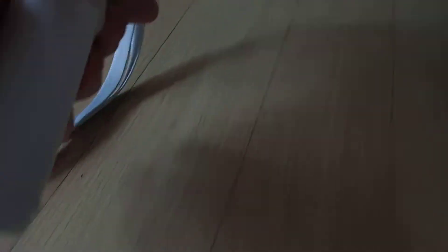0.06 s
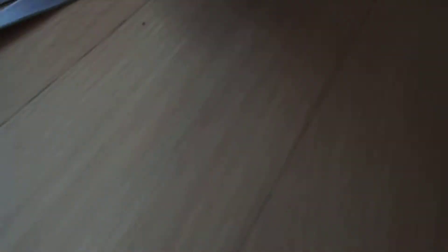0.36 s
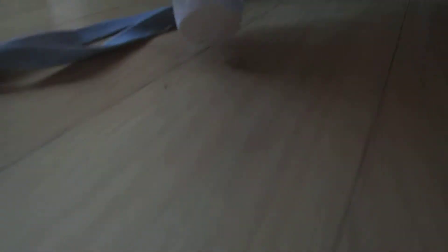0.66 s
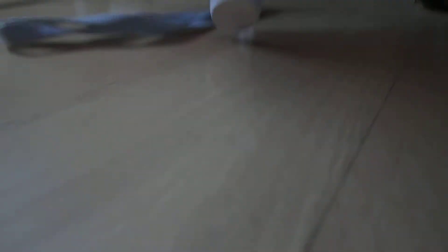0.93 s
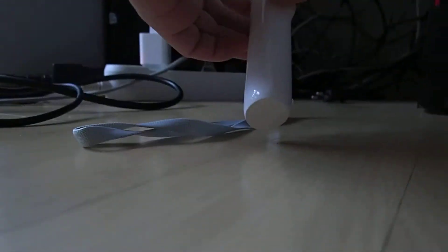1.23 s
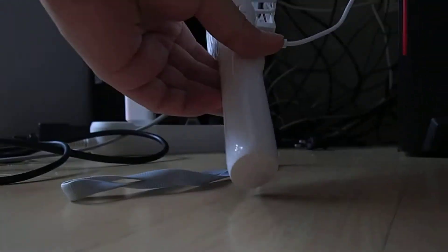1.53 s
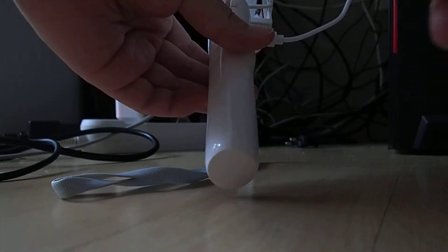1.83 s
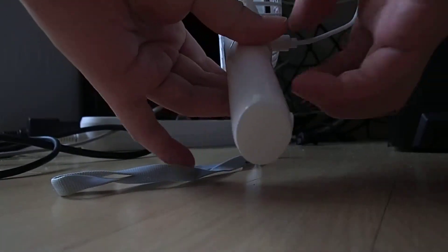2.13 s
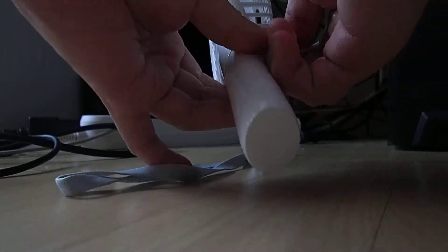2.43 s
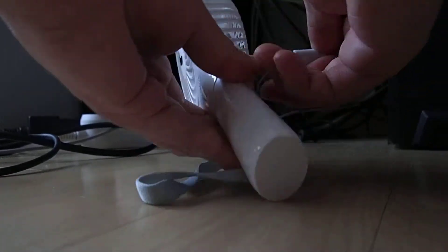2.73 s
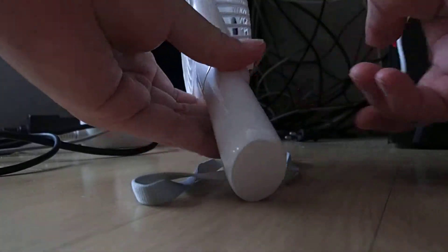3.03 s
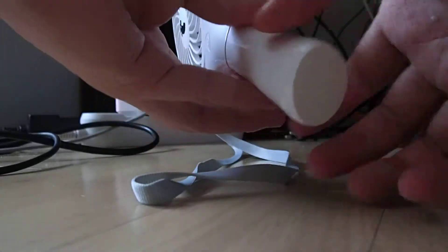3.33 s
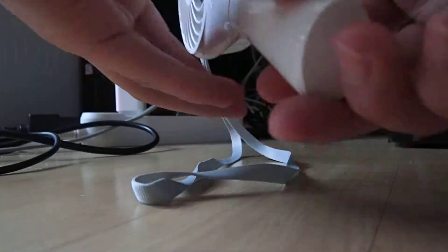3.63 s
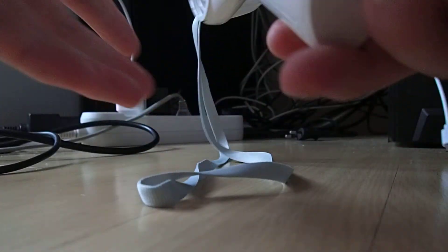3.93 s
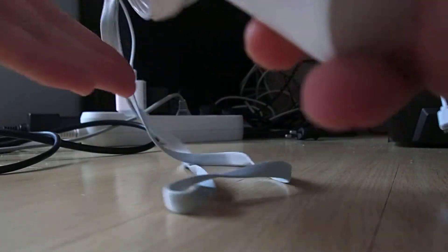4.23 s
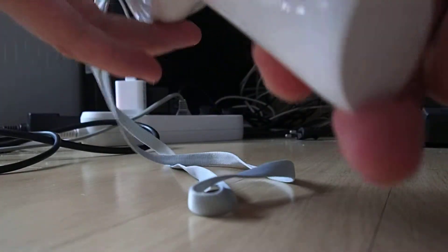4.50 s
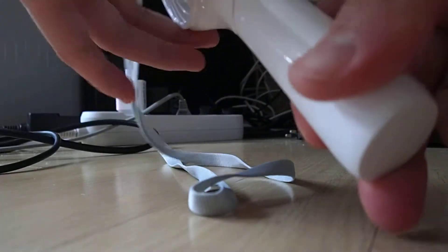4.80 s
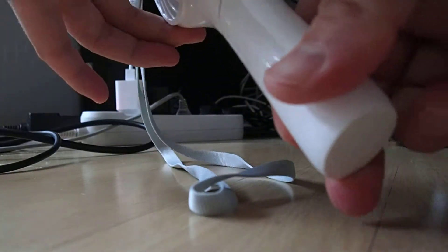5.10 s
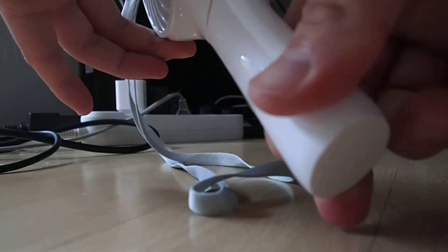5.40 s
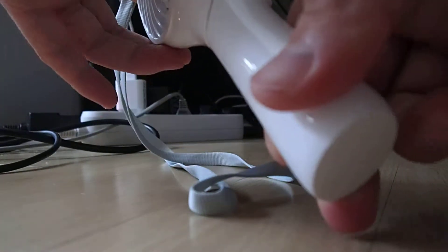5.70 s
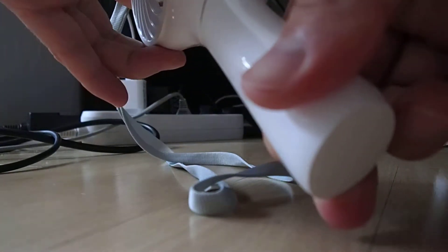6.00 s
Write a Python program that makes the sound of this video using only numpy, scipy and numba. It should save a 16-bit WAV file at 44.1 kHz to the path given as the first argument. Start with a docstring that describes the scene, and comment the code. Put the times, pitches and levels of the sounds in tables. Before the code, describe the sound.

A small battery fan whirs close by in a small room for all six seconds: a mid-pitched blade hum, a thin motor whine and rushing, hissing air, fairly quiet. A light plastic click comes at 0.5 seconds. At about 1.1 seconds the microphone lands on a wooden floor with a sharp thump, by far the loudest sound, bouncing into a quick chatter. Softer bumps and low rocking follow until 1.7 seconds, and the knocks briefly dip the fan's level. Fingers click on the plastic case at 1.6 seconds, and three sharp snaps between 2.6 and 2.8 seconds mark a cable being pulled out. Another click and a faint slide of skin come near 3.8 seconds. From about 4.4 seconds the fan is nearer and a hand chokes its airflow: it grows louder, rises slightly in pitch and stays rough and fluttering to the end.

```python
"""First you hear a small battery fan whirring close by: seven blades hum, a motor sings, air rushes.
A camera is set down on a wooden floor, bounces and rocks to rest; its knocks make its automatic
volume control turn the fan down briefly. Fingers click on the fan's plastic case and pull out its
cable. Then the fan comes closer with a hand behind it, choking the flow: the blades speed up a
little and the air turns rough."""
import sys
import numpy as np
from scipy import signal
from scipy.fft import rfft, irfft, next_fast_len
from scipy.io import wavfile
from scipy.ndimage import minimum_filter1d, map_coordinates
from numba import njit

SR = 44100
rng = np.random.default_rng(int(sys.argv[2]) if len(sys.argv) > 2 else 0)


def wrap_up_sound(samples):
    """Save the sound to the file named by the first command line argument, as 16-bit audio."""
    columns = np.atleast_2d(samples).T
    # keep every value between -1 and 1, then stretch to whole-number steps
    tamed = np.clip(columns, -1, 1)
    steps = np.round(tamed * 32767).astype(np.int16)
    wavfile.write(sys.argv[1], SR, steps)


N = 271215


def amp(db):
    """Turn decibels into a number to multiply by."""
    return 10 ** (np.asarray(db) / 20)


def peak_to_one(x):
    """Scale a sound so that its biggest peak is 1."""
    return x / np.abs(x).max()


def along(points, hz):
    """Read between (frequency, value) points, spaced by octaves."""
    f, v = np.transpose(points)
    return np.interp(np.log(hz + 1), np.log(f + 1), v)


def curve(points):
    """Join (time, value) points with straight lines, one value per sample."""
    return np.interp(np.arange(N) / SR, *np.transpose(points))


def wobble(rate):
    """A smooth curve through `rate` random values a second."""
    return map_coordinates(rng.standard_normal(int(N * rate / SR) + 4), [np.arange(N) * rate / SR])


def filtered(x, response):
    """Change the strength and phase of each frequency by response(hz)."""
    n = x.shape[-1]
    padded = next_fast_len(n + 8192)
    return irfft(rfft(x, padded) * response(np.fft.rfftfreq(padded, 1 / SR)), padded)[..., :n]


def resonances(modes, f):
    """How strongly these (pitch, width, level) peaks answer each frequency."""
    return sum(amp(db) * 1j * f * w / (c * c - f * f + 1j * f * w) for c, w, db in modes)


def ring(hz, t60, t):
    """A tone that swells within a cycle, then fades by 60 dB in t60 seconds."""
    return np.sin(2 * np.pi * hz * t) * amp(-60 * t / t60) * (1 - np.exp(-2 * hz * t))


def add(track, s, sound):
    """Mix a sound into a track, starting at s seconds."""
    part = track[..., round(s * SR):][..., :sound.shape[-1]]
    part += sound[..., :part.shape[-1]]


def panned(x, lean_db):
    """Make a sound stereo, lean_db louder on the left."""
    return x * amp([[lean_db / 2], [-lean_db / 2]])


def left_right(points, hz):
    """Share a left-minus-right amount between the two sides, half each."""
    return np.outer([.5, -.5], along(points, hz))


def background_hiss():
    """A faint, even hiss under everything."""
    return amp(-56) * rng.standard_normal((2, N))


def room(x, t60):
    """Floor and walls scatter a sound into a short echo, different on each side."""
    t = np.arange(SR // 3) / SR
    tail = rng.standard_normal((2, len(t))) * amp(-60 * t / t60)
    return signal.fftconvolve(x, tail / np.linalg.norm(tail[0]), axes=1)[:, :N]


# pitches the fan's housing weakens: (frequency [Hz], width [Hz], level change [dB])
HOUSING_DIPS = [(1010, 119, -15), (1887, 119, -10), (2463, 305, -9.5), (3382, 140, -10.5), (3955, 310, -11),
                (4813, 66, -23), (6700, 280, -0.5)]
def housing_db(hz):
    """Some pitches partly cancel themselves inside the fan's housing."""
    return sum(db * np.exp(-((hz - centre) / width) ** 2) for centre, width, db in HOUSING_DIPS)


# how alike left and right sound: (frequency [Hz], likeness [0-1])
STEREO_LIKENESS = [(60, 0.62), (250, 0.94), (2000, 1), (5000, 1), (8000, 0.66), (14000, 0.19)]
def rush(spectrum):
    """Stereo noise of average strength (rms) 1, shaped by a spectrum and the housing."""
    def colour(hz):
        spread = np.arccos(np.clip(along(STEREO_LIKENESS, hz), -1, 1)) / 2
        return amp(along(spectrum, hz) + housing_db(hz)) * [np.cos(spread), np.sin(spread)]
    mid, side = filtered(rng.standard_normal((2, N)), colour)
    noise = np.array([mid + side, mid - side])
    return noise / np.sqrt(np.mean(noise ** 2) + 1e-20)


# the tone of sliding skin: (frequency [Hz], relative level [dB])
SKIN_SPECTRUM = [(3000, -40), (7500, 7), (9500, -6), (12000, -3), (14500, -2), (16000, -3)]
# shifts of the grip: (time [s], length [s], level [dB])
GRIP_SLIDES = [(0.877, 0.045, -51), (2.597, 0.017, -41.5), (3.748, 0.32, -52.5)]
def rubbing():
    """Skin slides on the smooth handle with a soft, high, uneven hiss."""
    t = np.arange(N) / SR
    rise_s, fade_s = .008, .12
    strokes = np.zeros(N)
    for s, length, db in GRIP_SLIDES:
        fade_db = 60 * np.maximum(t - s - length, 0) / fade_s
        strokes += np.clip((t - s) / rise_s, 0, 1) * amp(db - fade_db)
    return strokes * amp(2.1 * wobble(60)) * rush(SKIN_SPECTRUM)


# pitches heard in the finger clicks, including the microphone's bright peak near 5.5 kHz:
# (pitch [Hz], width [Hz], relative level [dB])
CLICK_PEAKS = [(1330, 590, -3), (2010, 330, -8.5), (3050, 170, -8), (5040, 470, 6), (5590, 680, 9.5),
               (7570, 360, -5.5), (7760, 780, 0.5), (12800, 3300, -26)]
# snaps on the case: (time [s], click level [dB], fade time [s], brightness [dB per octave],
# knock level [dB], knock pitch [Hz])
CASE_SNAPS = [(0.499, -18.5, 0.0061, -3, -36, 209), (1.299, -27, .015, 8, -52, 300),
              (1.6289, -12.5, 0.011, -4.5, -16, 2160), (1.649, -25, 0.0096, -6, -27, 302),
              (2.6116, -20.5, 0.033, 11, -46, 500), (2.6936, -19.5, 0.038, 6, -27, 2160),
              (2.7747, -9.5, 0.015, -1, -20.5, 500), (2.786, -36, 0.0085, -3, -24.5, 336),
              (3.757, -22, 0.012, 20, -25.5, 3050)]
def clicks():
    """Fingers and plug snap on the fan's case: a bright click and a knock of its hollow parts."""
    track, t = np.zeros(N), np.arange(SR // 5) / SR
    colour = lambda f: sum(amp(db) * resonances([(hz, w, 0)], f) ** 2 for hz, w, db in CLICK_PEAKS)
    for s, click_db, t60, tilt_db, knock_db, knock_hz in CASE_SNAPS:
        snap = rng.standard_normal(len(t)) * amp(-60 * t / t60)
        click = filtered(snap, lambda f: colour(f) * amp(tilt_db * np.log2(1 + f / 2000)))
        knock = ring(knock_hz, 13 / knock_hz, t)
        add(track, s, amp(click_db) * peak_to_one(click) + amp(knock_db) * knock)
    return panned(track, lean_db=4.5)


# the camera's body on the boards: (pitch [Hz], width [Hz], relative level [dB])
BODY_MODES = [(320, 256, -1), (440, 63, -8.5), (616, 77, 0), (900, 75, -10.5), (1080, 125, -10),
              (1410, 200, -27)]
# the boards shake the two microphones unequally: (frequency [Hz], left minus right [dB])
THUD_BALANCE = [(130, 5), (450, 0.5), (1500, 2)]
# and slightly out of step: (frequency [Hz], left ahead by [radians])
THUD_PHASE = [(140, 0.3), (330, -0.55), (480, .15), (640, -1.25), (950, -0.44)]
def thud(contact_hz):
    """The camera's body thumps the floor; a softer contact (lower contact_hz) gives less treble."""
    low_cut = lambda f: 1j * f / (32 + 1j * f)  # the microphones miss deep bass
    softness = lambda f: 1 / (1 + 1j * f / contact_hz) ** 2 / (1 + 1j * f / 2100)
    tap = signal.unit_impulse(SR // 10)
    body = filtered(tap, lambda f: resonances(BODY_MODES, f) * low_cut(f) * softness(f))
    mics = lambda f: amp(left_right(THUD_BALANCE, f)) * np.exp(1j * left_right(THUD_PHASE, f))
    return filtered(peak_to_one(body), mics)


# pitches heard in each knock's ping: (pitch [Hz], relative level [dB], fade time [s])
PING_TONES = [(2340, -2, 0.012), (4470, -20, 0.0077), (5400, 7, 0.015), (5600, 13.5, 0.0088),
              (6770, 1.5, 0.0095), (7900, -19, 0.014)]
def bright_crack(contact_hz):
    """A short bright ping and crack on each knock, coloured by the microphone near 5.5 kHz."""
    t = np.arange(SR // 10) / SR
    extra_dbs, detunes = rng.normal(0, 2.5, len(PING_TONES)), rng.normal(1, .025, len(PING_TONES))
    ping = sum(amp(db + extra_db) * ring(hz * detune, t60, t)
               for (hz, db, t60), extra_db, detune in zip(PING_TONES, extra_dbs, detunes))
    burst = amp(5 - 60 * t / .0092) * rng.standard_normal((2, len(t)))
    reach_hz = 9000 * (contact_hz / 1000) ** 2  # harder contacts reach much higher
    crack = filtered(burst, lambda f: 1 / (1 + 1j * f / reach_hz) ** 2)
    return panned(peak_to_one(ping + crack), lean_db=9)


def floor_hit(thud_db, crack_db, contact_hz):
    """One touch of the camera on the floor: a dull thud plus a sharp crack."""
    return amp(thud_db) * thud(contact_hz) + amp(crack_db) * bright_crack(contact_hz)


def bounces():
    """The camera lands and tips over, its hops shrinking towards a last quick chatter."""
    track = np.zeros((2, N))
    landing_s, first_hop_s, second_hop_s, shortest_hop_s = 1.0645, .0428, .0238, .002
    later_hops = shortest_hop_s + (second_hop_s - shortest_hop_s) * .786 ** np.arange(11)
    hops = np.append(first_hop_s, later_hops)
    for s, speed in zip(landing_s + np.cumsum(hops) - hops, hops / first_hop_s):
        drop = np.log10(speed)  # a shorter hop means a slower, softer landing
        add(track, s, floor_hit(22 + 21.7 * drop, 15 + 29.8 * drop, contact_hz=1550 * speed ** .76))
    return track


# small pushes: (time [s], thud level [dB], crack level [dB], contact hardness [Hz], chatter length [s])
CAMERA_NUDGES = [(1.3383, -20.5, -17.5, 300, .002), (1.3526, -13, -21.5, 900, .019),
                 (1.4769, -2.5, -9.5, 525, .002), (1.479, -31, -11.5, 400, .002),
                 (1.5492, -19.5, -18.5, 400, .002), (1.6559, -22.5, -28, 705, .007)]
def nudges():
    """The camera is nudged into place; when its foot chatters, each touch is weaker and duller."""
    track, gap_s = np.zeros((2, N)), .0042
    for s, thud_db, crack_db, contact_hz, length in CAMERA_NUDGES:
        for k, delay in enumerate(np.arange(0, length, gap_s)):
            hit = floor_hit(thud_db - 2.5 * k, crack_db - 4 * k, contact_hz / np.sqrt(1 + k))
            add(track, s + delay, hit)
    return track


# the camera's rocking: (time [s], level [dB], pitch [Hz], fade time [s])
CAMERA_ROCKS = [(1.22, -13.5, 168, 0.2), (1.348, -12, 123, 0.092), (1.478, -13, 161.6, 0.15),
                (1.549, -16, 168, 0.072)]
def rocking():
    """The camera rocks on its foot with short, low tones."""
    track, t = np.zeros((2, N)), np.arange(SR // 3) / SR
    for s, db, hz, t60 in CAMERA_ROCKS:
        add(track, s, panned(-amp(db) * ring(hz, t60, t), lean_db=6.5))
    return track


# how much of the fan is heard from above the floor: (time [s], share [0-1])
RAISED_SHARE = [(0, 0.9), (.95, 0.68), (1.25, 0.31)]
# how near the fan is held, told by its hiss: (time [s], level [dB])
FAN_NEARNESS = [(0, -39), (.18, -36.5), (.3, -38.5), (.7, -39), (1.65, -42), (2.05, -40.5), (2.8, -40.5),
                (3.55, -41.5), (4.15, -37), (4.33, -37.5), (4.44, -34), (6.15, -32.5)]
def level_db(base_db, near_weight, raised_db):
    """A part of the fan's sound changes with how near it is and the side it is heard from."""
    nearer_db = curve(FAN_NEARNESS) + 40.5  # 0 at arm's length
    return base_db + near_weight * nearer_db + raised_db * curve(RAISED_SHARE)


# air through the grille, heard from above the floor: (frequency [Hz], relative level [dB])
RAISED_AIR_SPECTRUM = [(20, -32), (55, -15.5), (150, -11), (330, -5.5), (650, -12), (850, 4), (1020, 13),
                       (1300, -5), (1700, -8.5), (2200, -3.5), (3000, -11), (4000, -8.5), (5500, -44)]
# same columns: air flowing freely, air choked by the hand, hiss off the blade tips
FREE_AIR_SPECTRUM = [(20, -46), (50, -25), (85, -12.5), (140, -15.5), (260, -4), (410, -7.5), (540, 1.5),
                     (720, -6.5), (1150, -9.5), (1600, -4), (2100, -8.5), (2500, -15), (3900, -17.5),
                     (7000, -85)]
CHOKED_AIR_SPECTRUM = [(20, -59), (60, -24), (200, -16.5), (320, -1.5), (390, -6.5), (510, -3),
                       (600, -10.5), (820, -6.5), (1150, -9.5), (1600, -9), (2100, -10), (2500, -20),
                       (3900, -16), (7000, -52)]
TIP_HISS_SPECTRUM = [(2500, -70), (4000, -17), (4350, -10.5), (4550, -4.5), (5300, 4.5), (5700, 0.5),
                     (6300, -1), (7000, -9.5), (7900, -7), (8700, -16.5), (10000, -23.5), (12000, -27),
                     (16000, -30)]
def air(angle, choke):
    """Swirling air rushes through the grille and hisses off the blade tips, pulsing as they turn."""
    air_db = level_db(-45.5, near_weight=.4244, raised_db=1.5) + 7 * choke
    raised = curve(RAISED_SHARE)
    free = np.sqrt(raised) * rush(RAISED_AIR_SPECTRUM) + np.sqrt(1 - raised) * rush(FREE_AIR_SPECTRUM)
    grille = np.sqrt(1 - choke) * free + np.sqrt(choke) * rush(CHOKED_AIR_SPECTRUM)
    eddies_db = .63 * wobble(16) + (.36 + .35 * choke) * wobble(350)
    pulse_db = .39 * np.sin(angle) + .22 * np.sin(angle / 3) + .5 * np.sin(2 * angle / 3)
    tip_hiss = amp(curve(FAN_NEARNESS) + eddies_db + pulse_db) * rush(TIP_HISS_SPECTRUM)
    return amp(air_db + .61 * eddies_db) * grille + tip_hiss


def shaft_tones(table, angle, flutter_db):
    """Fluttering tones locked to the turning shaft, a little out of step between left and right."""
    phases = lambda: rng.uniform(0, 2 * np.pi) + rng.normal(0, .24, (2, 1))
    return sum(amp(db + flutter_db * wobble(13)) * np.sqrt(2) * np.sin(cycles * angle + phases())
               for cycles, db in table)


BLADES = 7
# blades whining past the struts, and the motor: (pitch [cycles per turn], relative level [dB])
WHINE_TONES = [(21, 0), (28, -9.5), (35, -18)]
MOTOR_TONES = [(12, -14.5), (14, 5.5), (16, 3), (19, -16), (20, -8), (22, -48), (24, -5.5), (32, -13),
               (40, -33), (45, -23.5)]
# the whine's beam swings by as the fan is turned: (time [s], level [dB])
WHINE_LEVEL = [(0, -47.5), (.7, -57), (1.4, -47), (2.7, -46), (3.1, -47), (4.05, -41), (4.45, -51),
               (6.15, -43.5)]
# pockets of stalled air circling slower than the blades:
# (pitch [share of the hum's pitch], waver rate [Hz], level at full choke [dB])
STALL_POCKETS = [(.672, 22.19, -43), (.845, 27.72, -41.5)]
def rotor(angle, choke):
    """The blades hum and whine and the motor sings; choked air adds wavering tones."""
    sway = (.011 + .036 * choke) * wobble(55)  # uneven incoming air shakes the blade tones
    drift = .29 * wobble(1.4) * np.array([[1], [-1]])  # moving the fan shifts left against right
    hum_db = level_db(-41, near_weight=.39, raised_db=-11) + choke
    flutter_db = (.5 + 2 * choke) * wobble(30)
    hum = amp(hum_db + flutter_db) * np.sqrt(2) * np.sin(BLADES * (angle + sway) + drift)
    whine = amp(curve(WHINE_LEVEL)) * shaft_tones(WHINE_TONES, angle + sway, flutter_db=1)
    motor_db = level_db(-53.5, near_weight=1.09, raised_db=8.5) - 10.5 * choke
    motor = amp(motor_db) * shaft_tones(MOTOR_TONES, angle + choke * sway, flutter_db=1.6)
    stall = np.zeros(N)
    for share, rate, db in STALL_POCKETS:
        waver = wobble(rate) + 1j * wobble(rate)
        stall += amp(db) * np.real(waver * np.exp(1j * share * BLADES * angle))
    return filtered(hum + whine + motor + choke * stall, lambda hz: amp(housing_db(hz)))


# the free-running fan drifts in speed as it is turned: (time [s], blades passing [Hz])
BLADE_RATE = [(.8, 482.4), (1.9, 483.8), (2.45, 481), (2.7, 486), (3, 481), (3.45, 481.3), (4.3, 484)]
# the fan sits a little to the left: (frequency [Hz], left minus right [dB])
FAN_BALANCE = [(60, 0), (110, 3), (200, 1), (380, 2.5), (700, 2.5), (1290, 3.5), (2380, 1.5), (4400, 5),
               (8120, 0), (15000, 2)]
def fan():
    """One shaft drives tones and air; a hand chokes the flow, so the unloaded blades speed up."""
    hand_s, closing_s, choked_share = 4.365, .015, .84
    spin_up_hz, spin_up_s = 32.5, .29
    since_hand = np.arange(N) / SR - hand_s
    choke = choked_share * (1 + np.tanh(since_hand / (2 * closing_s))) / 2
    blade_hz = curve(BLADE_RATE) + spin_up_hz * (1 - np.exp(-np.maximum(since_hand, 0) / spin_up_s))
    shaft_hz = blade_hz / BLADES * (1 + .001227 * wobble(7))
    angle = 2 * np.pi * np.cumsum(shaft_hz) / SR
    wind = air(angle, choke)
    sound = rotor(angle, choke) + wind + amp(-12) * room(wind, t60=.24)
    return filtered(sound, lambda hz: amp(left_right(FAN_BALANCE, hz)))


# fan and fingers reach the two microphones out of step: (frequency [Hz], left ahead by [radians])
MIC_PHASE = [(100, -0.09), (4480, -0.49), (5770, -0.78), (6370, 0.41), (9560, -0.024)]
def scene():
    """Fan, fingers and camera knocks in a small room, over a faint hiss."""
    handling = clicks() + rubbing()
    knocks = bounces() + nudges() + rocking()
    held_fan = filtered(fan() + handling, lambda hz: np.exp(1j * left_right(MIC_PHASE, hz)))
    echo = room(amp(-10) * handling + amp(-40) * knocks, t60=.14)
    return background_hiss() + echo + knocks + held_fan


@njit
def follow(excess, attack, release):
    """Rise quickly to the excess level and fall back slowly."""
    out, held = np.zeros(len(excess)), 0.0
    for i in range(len(excess)):
        held += (excess[i] - held) * (attack if excess[i] > held else release)
        out[i] = held
    return out


def volume_control(x, threshold_db, attack_s, release_s):
    """Turn both sides down when a peak is about to pass the threshold."""
    peak = -minimum_filter1d(-np.abs(x).max(axis=0), size=41)
    excess_db = np.maximum(20 * np.log10(peak + 1e-9) - threshold_db, 0)
    return x * amp(-follow(excess_db, 1 / (attack_s * SR), 1 / (release_s * SR)))


def record(dry):
    """The camera turns loud peaks down, flattens any still too big and drops the highest treble."""
    ducked = volume_control(dry, threshold_db=-8, attack_s=.0014, release_s=.063)
    return filtered(np.clip(ducked, -1, 1), lambda hz: hz < 15850)


dry = scene()
out = record(dry)
wrap_up_sound(out)
```